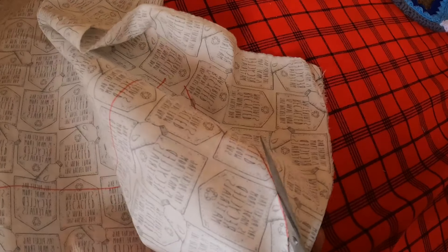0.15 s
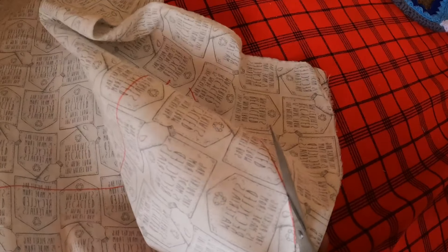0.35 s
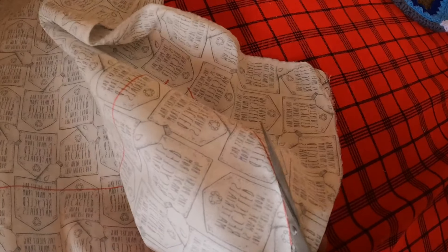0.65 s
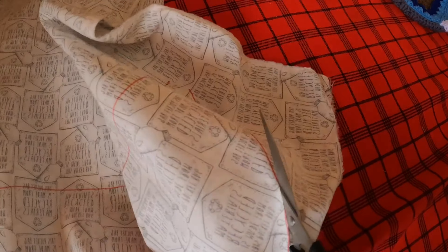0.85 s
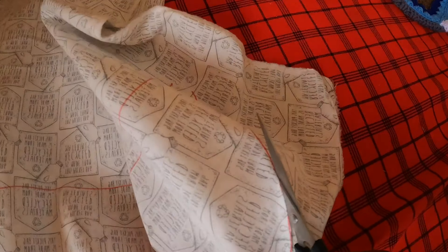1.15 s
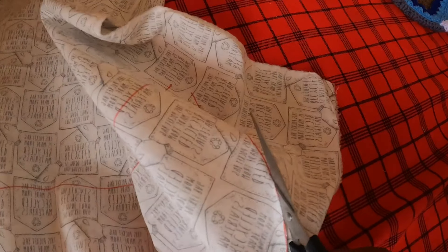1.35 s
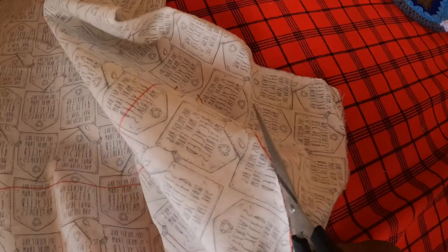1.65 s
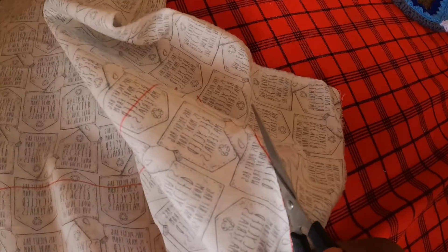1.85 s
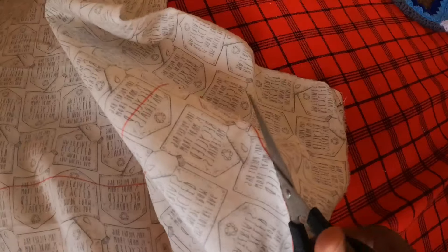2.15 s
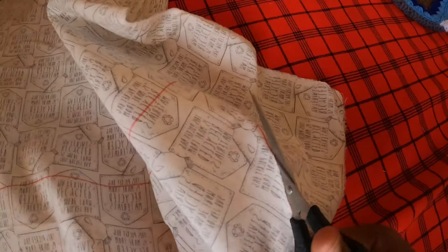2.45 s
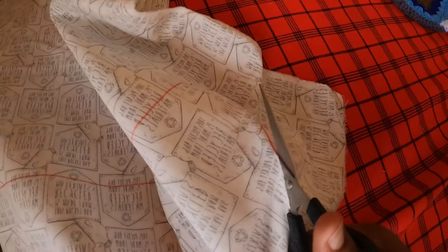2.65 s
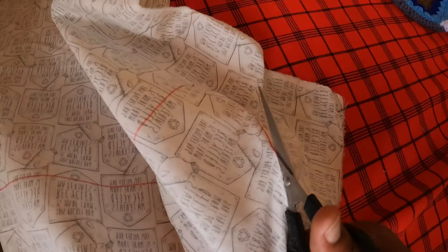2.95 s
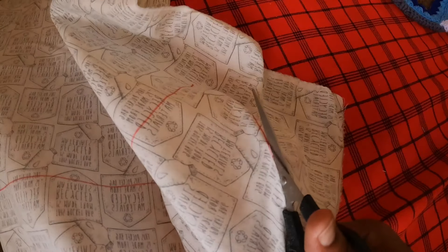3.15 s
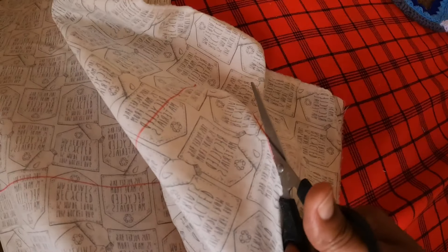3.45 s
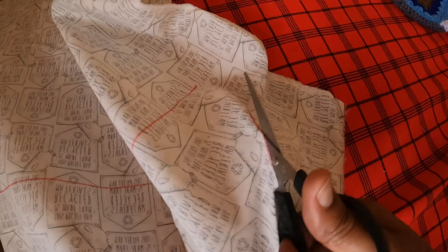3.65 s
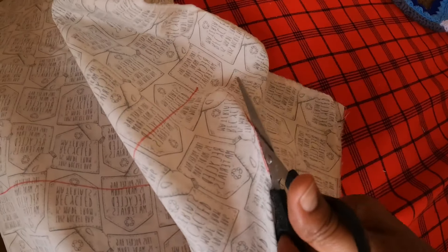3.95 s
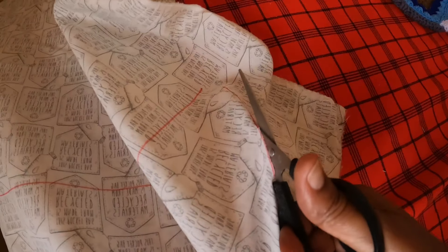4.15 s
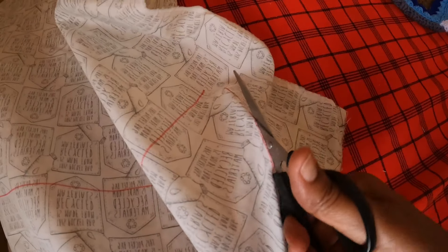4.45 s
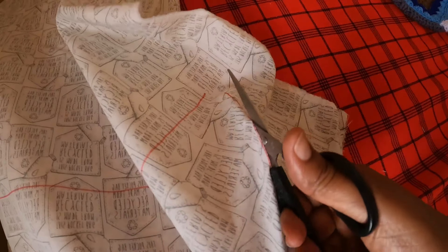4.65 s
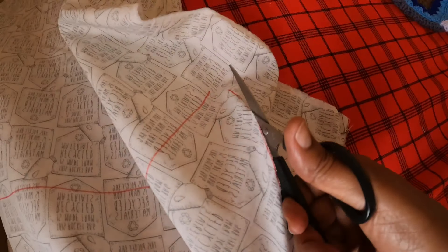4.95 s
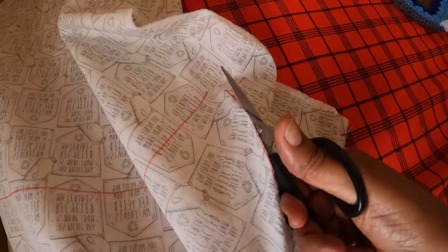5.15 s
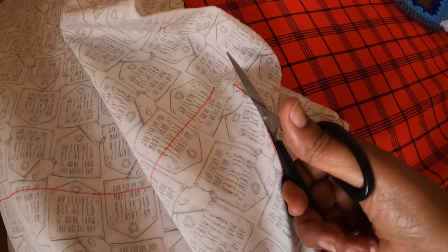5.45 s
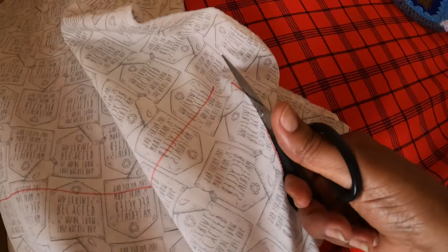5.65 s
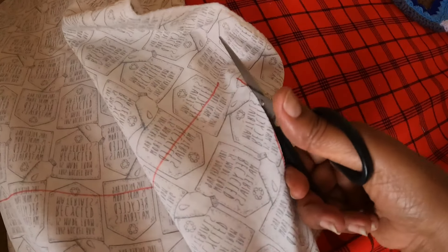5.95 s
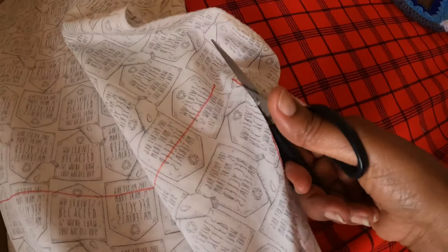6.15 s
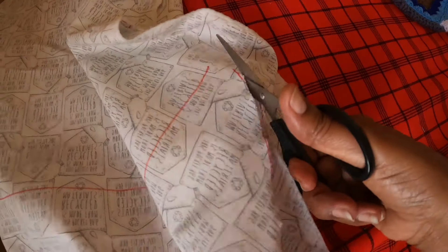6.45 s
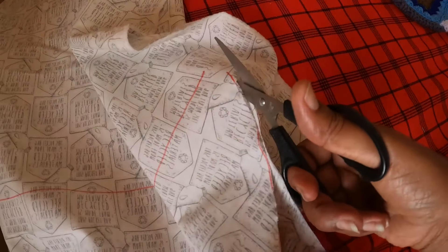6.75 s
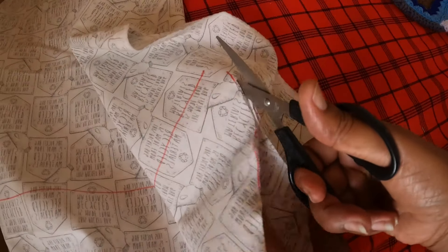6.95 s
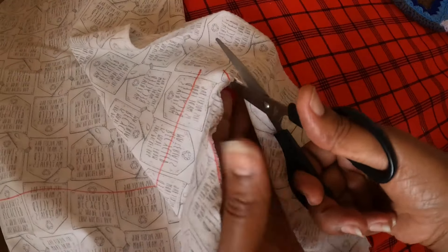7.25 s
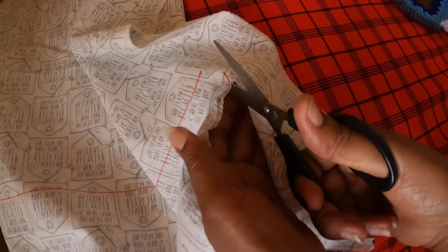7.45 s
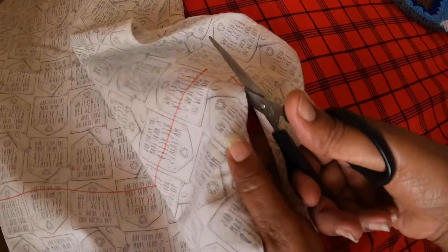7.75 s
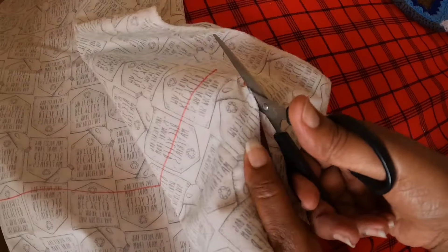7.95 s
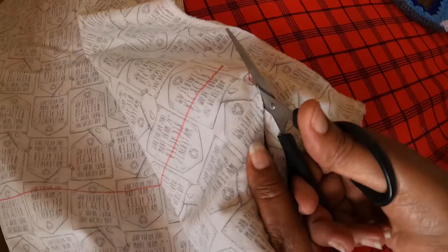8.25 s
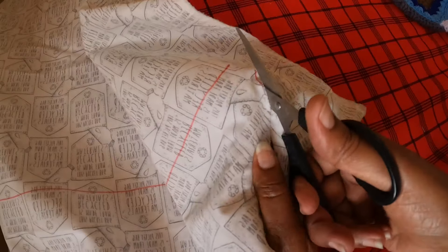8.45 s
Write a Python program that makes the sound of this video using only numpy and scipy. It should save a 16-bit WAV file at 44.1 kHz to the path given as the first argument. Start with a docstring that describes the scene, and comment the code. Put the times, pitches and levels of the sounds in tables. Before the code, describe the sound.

Very close to the microphone in a small furnished room, scissors cut cotton cloth in fourteen crunchy snips at an even pace, each a rapid crackle of parting threads with a dull cloth knock, followed by a softer rub as the blades open. The last snip is slower. Then a hand smooths the cloth with faint rustles and a few light taps. A low rumble lies underneath.

```python
"""Scissors through cotton, close up

Fourteen snips cut cotton cloth on a table in a small furnished room, close to a two-port microphone; the last is slow.
Threads part one by one: a noise burst cracks and rings the blades, and damped swings give a dull cloth knock.
Shaped fibre clicks make the shear, the blades rubbing open and, at the end, a hand smoothing the cloth.
Soft bumps of the table, a low rumble with deep swells and a late low tone lie behind."""
import sys
import numpy as np
from scipy import signal
from scipy.fft import rfft, irfft
from scipy.io import wavfile
from scipy.ndimage import uniform_filter1d

SR = 44100
rng = np.random.default_rng(int(sys.argv[2]) if len(sys.argv) > 2 else 0)


def unload_wav(signal):
    """Save mono or channel-first audio to the path in sys.argv[1] as 16-bit WAV at rate SR, clipped to [-1, 1]."""
    wavfile.write(
        sys.argv[1],
        SR,
        np.round(np.clip(np.atleast_2d(signal).T, -1, 1) * 32767).astype(np.int16),
    )


N = 379260
TIME, HZ = np.arange(N) / SR, np.fft.rfftfreq(N, 1 / SR)

# Relative levels are shaped further by source trims, chance or filters.
# Still room tone: pitch_hz, relative_db_per_hz
AIR_COLOUR = [(100, 1.5), (300, -2.5), (600, -13.5), (850, -18.5), (1050, -10), (1450, -15), (2300, -21.5),
              (6700, -42), (11700, -45), (15000, -56)]
AIR_DB = -61.5
# Deep steady rumble, and the wandering mutter above it: pitch_hz, relative_db_per_hz
DEEP_COLOUR = [(10, -0.5), (22, 13.5), (34, 9.5), (44, 16.5), (50, 13.5), (56, 10.5), (66, 12.5),
               (100, -42)]
MUTTER_SPECTRUM = [(45, -25), (72, 1.5), (100, -3), (160, -1.5), (220, -11.5), (300, -20), (450, -34),
                   (900, -45)]
RUMBLE_DB, MUTTER_DB = -52.5, -58

# Deep swells of the low rumble near 48 Hz: strongest_s, length_s, relative_db
DEEP_SWELLS = [(0.042, 0.12, -45), (1.213, 0.045, -43.5), (1.381, 0.11, -45.5), (1.999, 0.075, -44),
               (3.159, 0.063, -42), (3.47, 0.095, -44.5), (3.811, 0.13, -42), (4.312, .07, -45.5),
               (4.441, 0.068, -46), (6.3, 0.095, -47.5), (6.927, 0.076, -42), (7.089, 0.044, -43),
               (7.35, 0.093, -44), (7.642, 0.035, -44), (7.768, 0.051, -45), (7.95, 0.073, -45),
               (8.309, 0.069, -43.5), (8.54, 0.12, -45)]
SWELL_HZ = 47.97  # centre of their slightly scattered pitches
# Soft bumps on the table: pitch_hz, relative_db_per_hz
TABLE_COLOUR = [(45, -45), (72, 4), (100, -2), (130, -3), (160, -1.5), (220, -10.5), (300, -17),
                (450, -29.5), (900, -37.5)]

# Cloth shifts on the table, then slides under the hand: start_s, fastest_s, end_s, relative_db
CLOTH_SLIDES = [(3.6, 5.5, 5.9, -82), (6.37, 6.48, 6.86, -66.5), (6.57, 6.67, 6.7, -64),
                (6.6, 7.05, 7.34, -68.5), (7.19, 7.23, 7.38, -69), (7.25, 7.5, 7.75, -75),
                (7.7, 7.79, 7.9, -60), (8.0, 8.27, 8.45, -73)]
CREEP_DB = -76  # relative; held cloth is never quite still
# Rustle of the sliding cloth: pitch_hz, relative_db_per_hz
SLIDE_COLOUR = [(400, -3), (900, 0.5), (1400, 9.5), (2200, 0), (3200, 1), (4300, -2.5), (7000, -1.5),
                (10000, -11), (12500, -14), (14500, -38)]

# Blades close: start_s, hardest_s, end_s, shear_relative_db, last_thread_s, threads_per_s at the hardest point,
# crack_relative_db, knock_relative_db, table_bump_relative_db
BLADE_CLOSINGS = [(0.126, 0.174, 0.29, -44, 0.22, 190, -42, -43, -55),
                  (0.534, 0.595, 0.64, -44, 0.63, 170, -45.5, -51, -59),
                  (0.984, 1.033, 1.115, -45, 1.09, 210, -44.5, -49, -49),
                  (1.41, 1.464, 1.563, -46, 1.534, 194, -43, -40.5, -48),
                  (1.871, 1.924, 2.075, -53, 1.968, 185, -39.5, -36, -44),
                  (2.284, 2.334, 2.47, -48, 2.384, 163, -43, -40.5, -47.5),
                  (2.944, 3.031, 3.146, -46.5, 3.07, 136, -43.5, -39.5, -45.5),
                  (3.424, 3.505, 3.624, -45, 3.52, 166, -40.5, -37, -46.5),
                  (3.827, 3.923, 4.05, -47, 3.94, 177.4, -42, -39, -49),
                  (4.286, 4.343, 4.44, -42, 4.41, 200, -40.5, -39.5, -47.5),
                  (4.68, 4.79, 4.93, -49, 4.79, 157.5, -37, -37, -56),
                  (5.145, 5.242, 5.36, -45.5, 5.24, 180, -37, -39, -52),
                  (5.611, 5.692, 5.87, -54.5, 5.75, 191, -37, -40, -52),
                  (6.125, 6.25, 6.42, -54, 6.27, 60, -49, -57, -51.5)]
ENTRY_S = .028  # the edges meet the cloth this long after they start to close
# Single cracks, loud or set apart, some faint: time_s, crack_relative_db, knock_relative_db
SINGLE_CRACKS = [(0.1377, -45.5, -66), (0.1556, -38.5, -36), (0.2465, -43, -57), (0.4416, -59, -56),
                 (0.5307, -54.5, -70), (0.6223, -38.5, -52), (0.9731, -54.5, -71), (1.006, -44, -44.5),
                 (1.084, -40.5, -56), (1.436, -35, -37), (1.5021, -36.5, -38), (1.5209, -53, -50),
                 (1.8831, -44, -49), (1.8957, -35.5, -38), (1.9113, -34, -40), (1.9334, -37, -36),
                 (1.9457, -34, -35), (1.9824, -40, -47), (1.9969, -39.5, -38.5), (2.0102, -45.5, -44),
                 (2.3012, -45, -49), (2.3136, -37.5, -39), (2.438, -53, -47), (2.9452, -45, -61),
                 (2.9655, -38, -65), (2.9982, -33.5, -45), (3.0065, -40, -34.5), (3.0788, -39.5, -34),
                 (3.1126, -47.5, -43), (3.461, -36.5, -37), (3.4962, -37, -31), (3.5565, -36.5, -33),
                 (3.5773, -42, -39), (3.9279, -34.5, -31.5), (3.9754, -41, -38.5), (3.9876, -41, -40.5),
                 (4.324, -40, -33), (4.335, -32, -34.5), (4.3844, -54, -36), (4.4974, -37.5, -37),
                 (4.5697, -55, -49.5), (4.5812, -47, -49.5), (4.6911, -46.5, -49), (4.7291, -35, -37),
                 (4.761, -34, -38), (4.7949, -31.5, -30.5), (4.8192, -33, -38), (4.8438, -37.5, -45),
                 (4.9836, -41.5, -53), (5.1605, -38.5, -49), (5.2229, -36.5, -37), (5.2357, -31.5, -35),
                 (5.253, -32.5, -32), (5.286, -32.5, -38.5), (5.3715, -41.5, -52), (5.4189, -40, -59),
                 (5.478, -40.5, -53), (5.5235, -43.5, -54), (5.6299, -41, -47), (5.6813, -36, -37),
                 (5.723, -32, -47), (5.751, -37, -50), (5.7677, -40, -54), (5.8884, -43, -61),
                 (5.9481, -39, -53), (6.1757, -42, -62), (6.2, -36.5, -42), (6.223, -31.5, -41),
                 (6.2267, -35.5, -40), (6.248, -32, -45), (6.2781, -34.5, -43), (6.3025, -36, -46),
                 (6.3125, -38.5, -48), (6.3392, -41.5, -46), (6.3584, -49, -57)]
# The knock sinks as the cut advances and the cloth slackens: time_s, centre_hz
CLOTH_PITCH = [(0.2, 1020), (1.9, 940), (2.4, 880), (3.0, 763.2), (3.9, 666), (4.4, 647.6), (4.8, 590.6),
               (5.7, 495), (6.3, 363.3)]
# Drift between three crack colours, easing back near the end (clipped to 0-2): time_s, colour_place
CRACK_TONE = [(1.1, 0.29), (1.9, 1.04), (3.5, 1.043), (4.3, 1.7), (4.8, 2.15), (5.7, 1.98), (6.3, 1.69)]
# The three crack colours, at places 0, 1 and 2: pitch_hz, relative_db_per_hz
CRACK_FIRST = [(300, -16.5), (800, -2.5), (1350, 3.5), (2120, -4.5), (2650, 1.5), (4000, -3.5),
               (5200, -1.5), (6200, -7), (7300, -3.5), (8500, -14.5), (10000, -9.5), (12000, -18),
               (15000, -39.5)]
CRACK_SECOND = [(300, -19), (900, 5), (1850, -3), (2150, -14), (2800, -13.5), (3600, -2.5), (4370, -5.5),
                (5300, 1), (6060, -7), (7000, -6), (10000, -10.5), (13000, -20.5), (15500, -41)]
CRACK_THIRD = [(300, -8.5), (900, -6), (1400, 4.5), (1850, 2.5), (2300, -1), (3300, 1), (4300, -4),
               (5200, -1.5), (6500, -10), (10000, -16), (12500, -27.5), (15500, -42)]
# Steel blades ringing briefly in the grip: pitch_hz, relative_db, t60_s
BLADE_MODES = [(1290, 1, .025), (1860, -4, 0.036), (2260, -9.5, 0.025), (2650, -4.5, 0.033),
               (3230, -1, 0.034), (3590, -2, 0.028), (3860, -6, .022), (5160, -6, .018), (6720, -7, 0.03),
               (8620, -20, 0.026)]
# Drag of taut cloth early in the cut and slack cloth late: pitch_hz, relative_db_per_hz
DRAG_TAUT = [(100, -1), (200, 3), (290, -8), (420, -8.5), (650, -5.5), (1200, -7.5), (2200, -21),
             (6000, -21)]
DRAG_SLACK = [(100, -11), (280, 3.5), (650, 4), (1200, -5.5), (2200, -8), (6000, -33.5)]

# Blades rub open or slide forward: start_s, fastest_s, end_s, relative_db
BLADE_RUBS = [(0.308,0.355,0.46,-52), (0.705,0.75,0.91,-52), (1.16,1.2,1.366,-57.5), (1.582,1.65,1.748,-53),
              (2.045,2.09,2.176,-52.5), (2.47,2.505,2.67,-52), (2.655,2.713,2.775,-60),
              (3.195,3.225,3.377,-52.5), (3.618,3.665,3.816,-54), (4.055,4.14,4.21,-52.5),
              (4.465,4.505,4.63,-52), (4.91,4.955,5.1,-54.5), (5.33,5.45,5.59,-52.5),
              (5.83,5.935,6.05,-52.5), (7.61,7.69,7.76,-63.5)]
# Colour of the rub early and late in the drift: pitch_hz, relative_db_per_hz
RUB_EARLY = [(150, 1), (400, 0), (650, 3.5), (850, 1), (1300, 2), (2200, -5.5), (3100, -5.5), (4300, -17),
             (5200, -8.5), (8000, -17.5), (10500, -23), (13000, -29), (15500, -41)]
RUB_LATE = [(150, 1), (400, -0.5), (800, -13), (1400, -2), (2200, 0.5), (3300, -5), (4300, -15.5),
            (5200, -9.5), (9500, -21), (13000, -31.5), (15500, -53)]
# Cloth tugs and flaps against the table: start_s, strongest_s, end_s, relative_db
CLOTH_TUGS = [(0.315, 0.345, 0.455, -47.5), (0.71, 0.745, 0.85, -44), (1.17, 1.2, 1.31, -51.5),
              (0.99, 1.05, 1.2, -49.5), (1.44, 1.5, 1.54, -47), (1.87, 1.95, 2.09, -49),
              (2.05, 2.1, 2.09, -50.5), (2.48, 2.505, 2.54, -42.5), (3.19, 3.225, 3.27, -50),
              (5.98, 6.015, 6.04, -50)]
# Colour of those tugs: pitch_hz, relative_db_per_hz
TUG_SPECTRUM = [(70, -27), (130, 7), (220, 2.5), (300, -8.5), (390, -8.5), (520, -22), (900, -21)]

# A low tone swells near the last snip, holds and dies away
TONE_HZ, TONE_DB = 161.7, -49
TONE_START_S, TONE_SWELL_S = 5.98, 0.13
TONE_FADE_AFTER_S, TONE_FADE_DB_PER_S = 0.61, 23  # the fade begins this long after the start

# Light taps of fingers and handles: start_s, relative_db
LIGHT_TAPS = [(6.565, -58), (8.105, -52.5), (8.233, -53.5), (8.282, -59), (8.404, -47), (8.422, -54)]
# Colour of the taps: pitch_hz, relative_db_per_hz
HANDLE_COLOUR = [(400, -14), (900, -7), (1400, 2.5), (2200, -14), (7000, -19), (12000, -36)]

# Likeness of the two microphone ports: pitch_hz, likeness (0-1)
PORT_LIKENESS = [(60, 1), (700, .997), (2000, .985), (3100, .95), (7000, .9), (14000, .55)]
# Phase between the ports: pitch_hz, left_lead_rad
PORT_LEAD = [(60, -0.17), (700, 0.05), (1800, -0.48), (3200, -0.69), (5000, -0.55), (9000, -0.45),
             (14000, -0.64)]
# Level between the ports: pitch_hz, left_minus_right_db
PORT_BALANCE = [(60, .5), (200, -2.2), (700, -1.4), (1300, -1.9), (2400, -.8), (4400, -0.36), (8000, 0.83),
                (15000, 2)]
SCATTER_S = .003  # time constant of the table reflections
# Dying away of the room: pitch_hz, t60_s
ROOM_DECAY = [(200, 0.18), (1000, 0.14), (4000, 0.087), (12000, 0.042)]
EDGE_HZ = 15900  # cutoff of the recorder


def amp(db):
    """Decibels to gain."""
    return 10 ** (np.asarray(db) / 20)


def evened(x):
    """Scales to rms 1."""
    return x / np.sqrt(np.mean(x ** 2) + 1e-20)


def read(points, hz):
    """Reads a table on a log-frequency axis."""
    f, value = np.transpose(points)
    return np.interp(np.log(hz + 1), np.log(f + 1), value)


def spectrum(colour, hz):
    """Gain of a colour table, falling steeply above its last point."""
    octaves_beyond = np.log2(np.maximum(hz / colour[-1][0], 1))
    return amp(read(colour, hz) - np.minimum(60 * octaves_beyond, 70))


def coloured(x, colour, size=2048):
    """Causal minimum-phase filter of unit energy with the given spectrum."""
    log_gain = np.log(spectrum(colour, abs(np.fft.fftfreq(size, 1 / SR))))
    response = np.exp(np.conj(signal.hilbert(log_gain)))
    taps = np.fft.ifft(response).real[:size // 2]
    return signal.oaconvolve(x, taps / np.linalg.norm(taps))[:N]


def noise(colour):
    """Steady noise of rms 1 with the given spectrum."""
    return evened(irfft(rfft(rng.standard_normal(N)) * spectrum(colour, HZ), N))


def add(mix, s, sound):
    """Mixes a sound in at s seconds."""
    part = mix[max(round(s * SR), 0):][:len(sound)]
    part += sound[:len(part)]


def stroke(rows, power=1.45):
    """The hand speeds up and slows down in one arch for each stroke."""
    level = 0
    for start, top, end, db in rows:
        phase = np.interp(TIME, [start, top, end], [0, .5, 1])
        level = level + amp(db) * abs(np.sin(np.pi * phase)) ** power
    return level


def uneven(depth_db, size):
    """Friction grips and lets go: a gain that wanders over about size samples."""
    wander = uniform_filter1d(uniform_filter1d(rng.standard_normal(N), size), size)
    return amp(depth_db * evened(wander))


def fibres(per_s, spread_db):
    """Tiny slips of single fibres: random clicks, a few much larger than the rest."""
    size = amp(spread_db * np.minimum(rng.exponential(1, N), 4))
    return evened(size * rng.standard_normal(N) * (rng.random(N) < per_s / SR))


def drifting(x, *colours):
    """The colour drifts between three spectra, easing back near the end."""
    place = np.clip(np.interp(TIME, *np.transpose(CRACK_TONE)), 0, 2)
    return sum(np.maximum(1 - abs(place - k), 0) * coloured(x, colour) for k, colour in enumerate(colours))


def air():
    """Still room tone: steady noise, independent at each port."""
    return amp(AIR_DB) * np.array([noise(AIR_COLOUR), noise(AIR_COLOUR)])


def rumble(wander_db=2.5):
    """A steady deep rumble under a low mutter that wanders in level."""
    deep = amp(RUMBLE_DB) * noise(DEEP_COLOUR)
    wander = uneven(depth_db=wander_db, size=3000)
    return deep + amp(MUTTER_DB) * noise(MUTTER_SPECTRUM) * evened(wander)


def deep_swells(detune=0.043):
    """The low rumble swells: deep sines of scattered pitch and phase under bell-shaped envelopes."""
    swells = np.zeros(N)
    chances = rng.standard_normal((len(DEEP_SWELLS), 2))
    for (s, length, db), (pitch, phase) in zip(DEEP_SWELLS, chances):
        hz = SWELL_HZ * (1 + detune * pitch)
        swing = np.sqrt(2) * np.sin(2 * np.pi * (hz * (TIME - s) + phase))
        swells += amp(db) * np.exp(-((TIME - s) / length) ** 2) * swing
    return swells


def cloth_sliding(rustle_db=-2):
    """The cloth creeps and slides, its weave slipping fibre by fibre with uneven grip."""
    speed = amp(CREEP_DB) + stroke(CLOTH_SLIDES)
    weave = fibres(per_s=16000, spread_db=1.2)
    slips = amp(rustle_db) * speed * weave * uneven(depth_db=1.6, size=600)
    return coloured(slips, SLIDE_COLOUR)


def throb(colour, size):
    """Low noise with its own swells softened, so that a level curve can shape it."""
    x = noise(colour)
    return evened(x / np.sqrt(uniform_filter1d(x ** 2, size) + .25))


def table_bumps():
    """Each snip bumps the table softly: low noise rising and falling with the closing blades."""
    return stroke([(*row[:3], row[-1]) for row in BLADE_CLOSINGS]) * throb(TABLE_COLOUR, size=1800)


def threads(per_end=.6, gap_spread=.3, crack_ends_db=-7, knock_ends_db=-18,
            crack_spread_db=2.0, knock_spread_db=3.0, count=40):
    """Edges cross the weave thread by thread, fastest and hardest in mid-stroke: time_s, crack_db, knock_db."""
    rows, taken = list(SINGLE_CRACKS), np.array(SINGLE_CRACKS)[:, 0]
    for start, top, end, _, last, per_s, crack_db, knock_db, _ in BLADE_CLOSINGS:
        s = start + ENTRY_S
        for gap, hard, dull in rng.standard_normal((count, 3)):
            force = np.sin(np.pi * np.interp(s, [start, top, end], [0, .5, 1]))
            # no ordinary thread gives too close to a listed single crack
            if s < last and abs(taken - s).min() > .5 / per_s:
                thread_crack_db = crack_db + crack_ends_db * (1 - force) + crack_spread_db * hard
                thread_knock_db = knock_db + knock_ends_db * (1 - force) + knock_spread_db * dull
                rows.append((s, thread_crack_db, thread_knock_db))
            s += np.exp(gap_spread * gap) / (per_s * (per_end + (1 - per_end) * force))
    return rows


def knock(hz, cycles, length=400):
    """A heavily damped swing with a soft start, of rms 1 over 3 ms."""
    turns = hz * np.arange(length) / SR
    swing = (turns / cycles) ** 2 * np.exp(-turns / cycles * 2) * -np.sin(2 * np.pi * turns)
    return swing / np.linalg.norm(swing) * np.sqrt(.003 * SR)


def blades(x, ring_db=-14, contact_db=2.5, size=3000):
    """Edge force is heard directly and through steel modes that come and go as the contact point slides."""
    t = np.arange(size) / SR
    modes = np.array([amp(db - 60 * t / t60) * np.sin(2 * np.pi * hz * t) for hz, db, t60 in BLADE_MODES])
    ring = np.zeros(N)
    for mode in modes:
        drive = x * evened(uneven(contact_db, size=size))
        ring += signal.oaconvolve(drive, mode)[:N]
    direct = drifting(x, CRACK_FIRST, CRACK_SECOND, CRACK_THIRD)
    return direct + amp(ring_db) * ring / np.linalg.norm(modes)


def snapping(tear_s=0.00037, swell_db=-14, lead_s=0.0044, tail_s=0.0026, snap=0.42, cycles=0.7,
             blade_hz=1280, blade_db=-4, damping_db=5.0, blade_cycles=2.2, early_s=0.00052):
    """Each crack swells briefly out of faint noise and dies away; the taut cloth and the blade swing back."""
    cracks, knocks = np.zeros(N), np.zeros(N)
    t = np.arange(-220, 330) / SR
    tear = np.exp(-abs(t) / tear_s)
    swell = amp(swell_db) * np.exp(-abs(t) / np.where(t < 0, lead_s, tail_s))
    chances = rng.standard_normal((700, len(t) + 3))
    for (s, hard_db, dull_db), chance in zip(threads(), chances):
        burst = chance[3:] * (tear + swell)
        burst += snap * np.linalg.norm(burst) * (t == 0)
        burst *= np.sqrt(.003 * SR) / np.linalg.norm(burst)  # rms 1 over 3 ms
        add(cracks, s + t[0] + .0003, amp(hard_db) * burst)
        cloth_hz = np.interp(s, *np.transpose(CLOTH_PITCH)) * np.exp(0.2 * chance[0])
        place = np.interp(s, *np.transpose(CRACK_TONE))
        steel_db = blade_db - damping_db * place + 2 * chance[1]  # weaker further along the drift
        steel_hz = blade_hz * np.exp(0.095 * chance[2])
        swing = knock(cloth_hz, cycles) + amp(steel_db) * knock(steel_hz, blade_cycles)
        add(knocks, s - early_s, amp(dull_db) * swing)
    return blades(cracks) + knocks


def shearing(shear_db=-3.0, drag_db=-3.5):
    """Fine crunch of fibres between the closing edges, with a duller drag of the cloth."""
    closing = stroke([row[:4] for row in BLADE_CLOSINGS])
    grains = closing * fibres(per_s=7000, spread_db=3.0) * uneven(depth_db=3, size=130)
    drag = drifting(grains, DRAG_TAUT, DRAG_TAUT, DRAG_SLACK)
    return amp(shear_db) * blades(grains) + amp(drag_db) * drag


def opening(rub_db=1.0, scrape_db=-7, scrape_hz=3250, scrape_q=4):
    """Steel slides on steel and cloth as the blades part, with one broad scraping resonance."""
    grains = stroke(BLADE_RUBS) * fibres(per_s=9000, spread_db=0.5) * uneven(depth_db=1.5, size=300)
    b, a = signal.iirpeak(scrape_hz, scrape_q, fs=SR)
    scrape = grains.std() * evened(signal.lfilter(b, a, grains))
    rub = drifting(grains, RUB_EARLY, RUB_EARLY, RUB_LATE)
    return amp(rub_db) * rub + amp(scrape_db) * scrape


def tugging():
    """The cloth tugs and flaps against the table: low noise swelling with each pull."""
    return stroke(CLOTH_TUGS) * noise(TUG_SPECTRUM)


def tone():
    """One low sine swells, holds and dies away."""
    t = TIME - TONE_START_S
    fade_db = TONE_FADE_DB_PER_S * np.maximum(t - TONE_FADE_AFTER_S, 0)
    envelope = np.clip(t / TONE_SWELL_S, 0, 1) * amp(TONE_DB - fade_db)
    return envelope * np.sqrt(2) * np.sin(2 * np.pi * TONE_HZ * TIME)


def tapping(tap_db=-3, tap_s=0.0085):
    """Fingers and handles tap lightly: short decaying noise bursts."""
    taps, t = np.zeros(N), np.arange(1500) / SR
    for s, db in LIGHT_TAPS:
        add(taps, s, amp(db + tap_db) * rng.standard_normal(len(t)) * np.exp(-t / tap_s))
    return coloured(taps, HANDLE_COLOUR)


def ports(x, size=1024):
    """Two microphone ports differ in phase, level and reflections off the table."""
    t = np.arange(size) / SR
    scatter = rng.standard_normal(size) * (1 - np.exp(-t / SCATTER_S)) * np.exp(-t / SCATTER_S)
    same, mid = read(PORT_LIKENESS, HZ), rfft(x)
    scatter_phase = np.exp(1j * np.angle(rfft(scatter, N)))
    side = mid * scatter_phase * np.sqrt((1 - same) / (1 + same))
    lean = amp(read(PORT_BALANCE, HZ) / 2) * np.exp(.5j * read(PORT_LEAD, HZ))
    return irfft(np.array([(mid + side) * lean, (mid - side) / lean]), N)


def room(x, size=16384):
    """A small furnished room: a short diffuse tail, different at each port."""
    late_noise = rng.standard_normal((2, size)) * (np.arange(size) > .004 * SR)
    hz, t, z = signal.stft(late_noise, SR, nperseg=256)
    decay = amp(-60 * t / read(ROOM_DECAY, hz)[:, None])
    tail = signal.istft(z * decay, SR, nperseg=256)[1]
    return signal.fftconvolve(x[None], tail / np.linalg.norm(tail[0]), axes=1)[:, :N]


def scene(room_db=-17, rumble_side_db=-15, bump_side_db=-18):
    """Scissors and hand close by, the table under them, the room around."""
    close = cloth_sliding() + snapping() + shearing() + opening() + tugging() + tapping()
    # separate draws, opposite in the two channels, widen the low sounds
    side = amp(rumble_side_db) * rumble() + amp(bump_side_db) * (deep_swells() + table_bumps())
    low = rumble() + deep_swells() + table_bumps() + tone() + np.array([[1], [-1]]) * side
    return ports(close) + low + amp(room_db) * room(close) + air()


def record(dry):
    """The recorder's band limit: a linear-phase low-pass."""
    low_pass = signal.firwin(255, EDGE_HZ, window=("kaiser", 9), fs=SR)
    return signal.oaconvolve(dry, low_pass[None], "same")


dry = scene()
out = record(dry)
unload_wav(out)
```